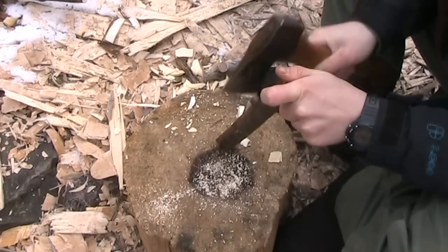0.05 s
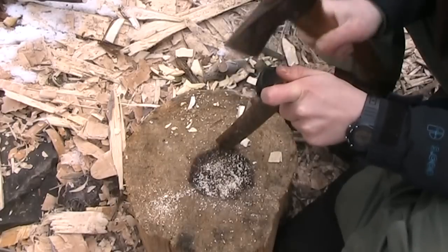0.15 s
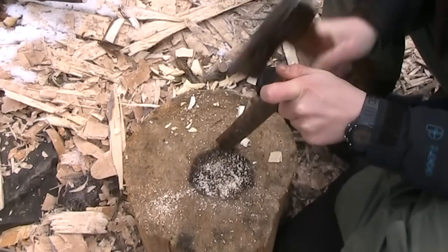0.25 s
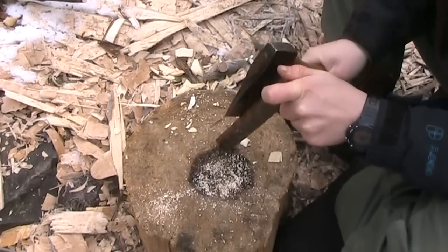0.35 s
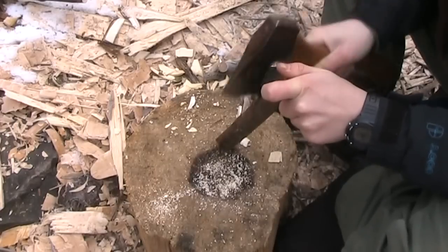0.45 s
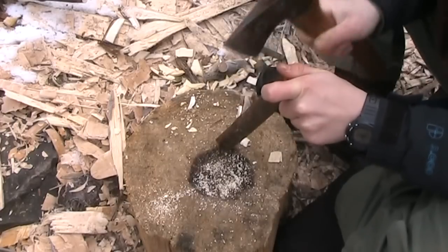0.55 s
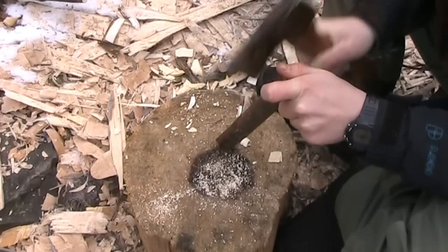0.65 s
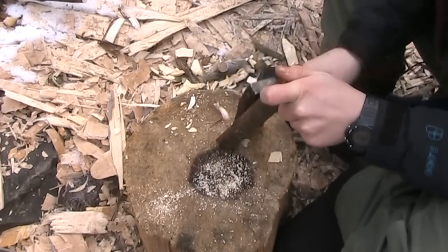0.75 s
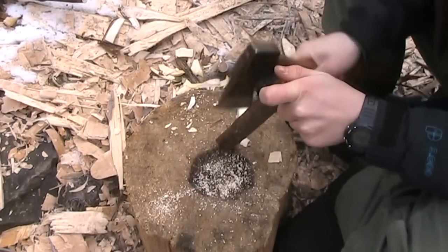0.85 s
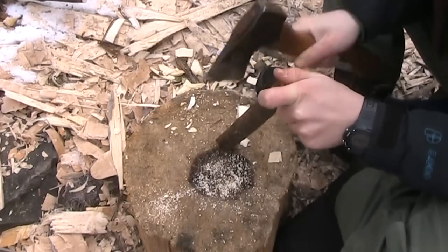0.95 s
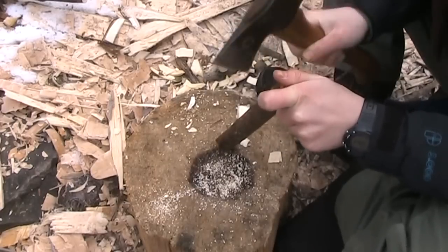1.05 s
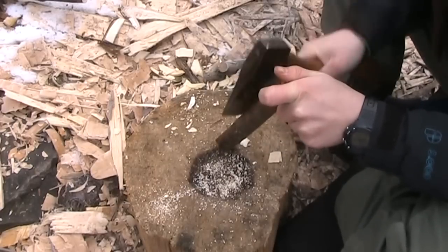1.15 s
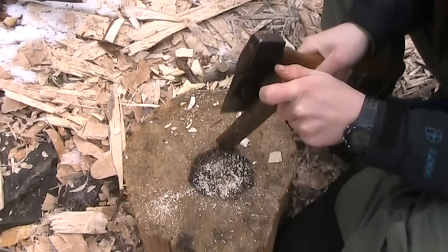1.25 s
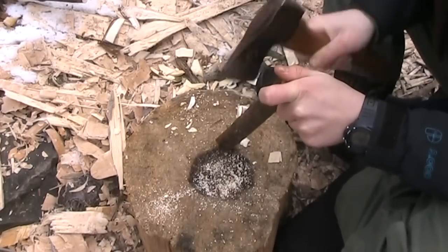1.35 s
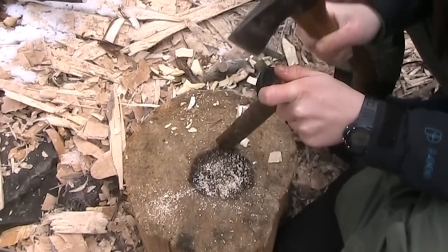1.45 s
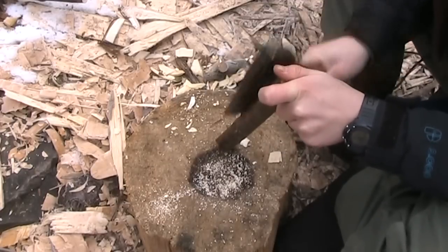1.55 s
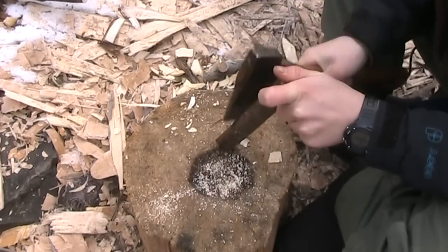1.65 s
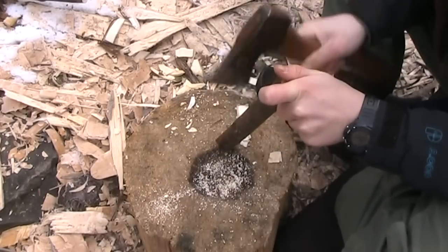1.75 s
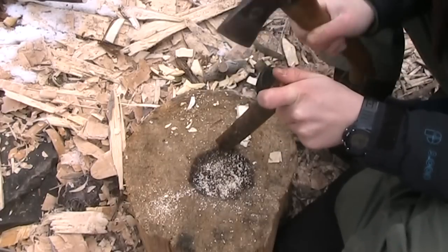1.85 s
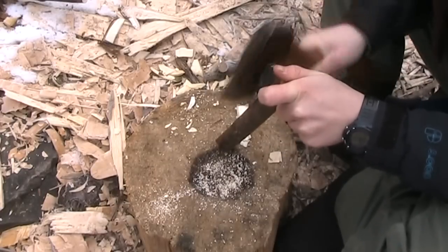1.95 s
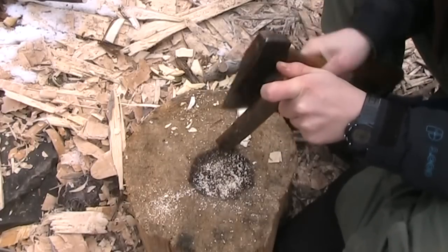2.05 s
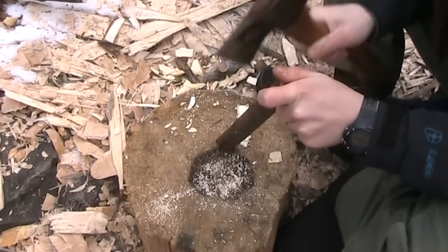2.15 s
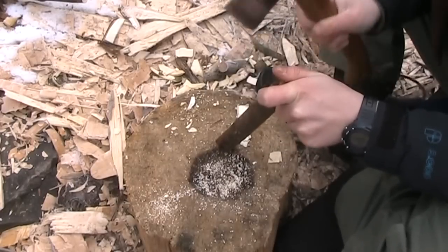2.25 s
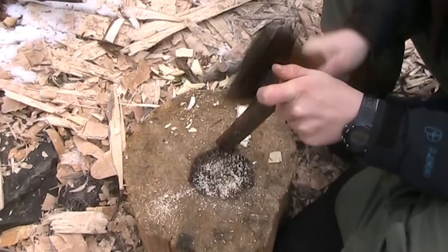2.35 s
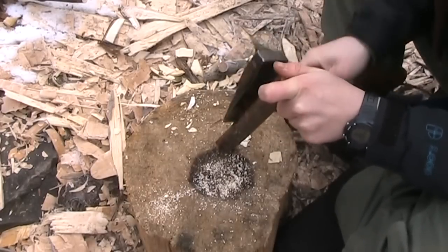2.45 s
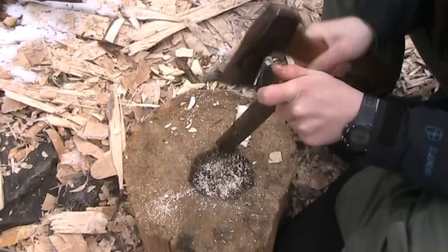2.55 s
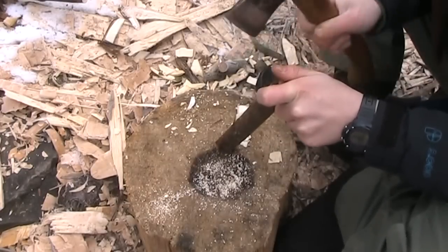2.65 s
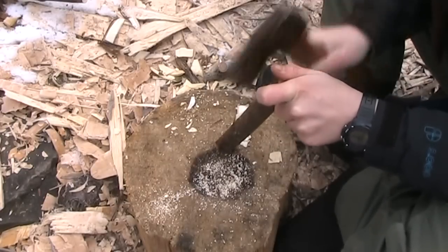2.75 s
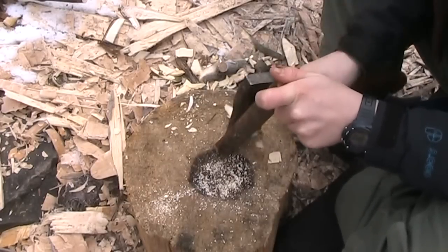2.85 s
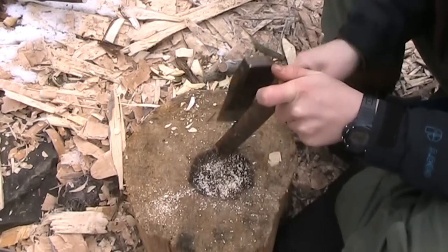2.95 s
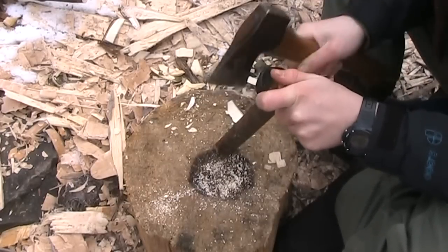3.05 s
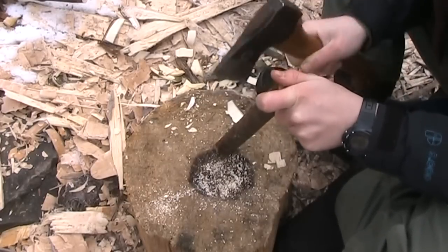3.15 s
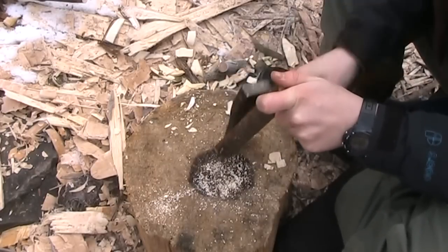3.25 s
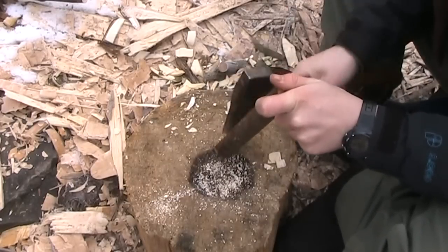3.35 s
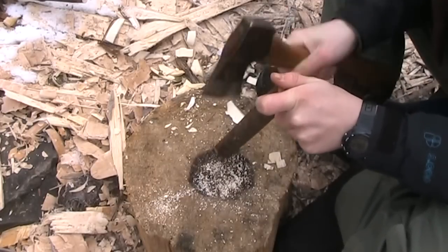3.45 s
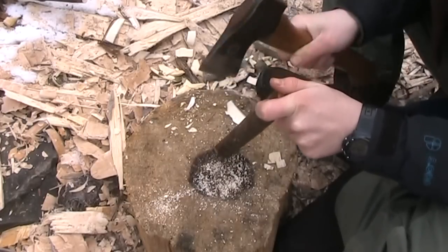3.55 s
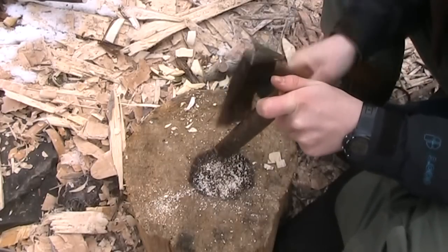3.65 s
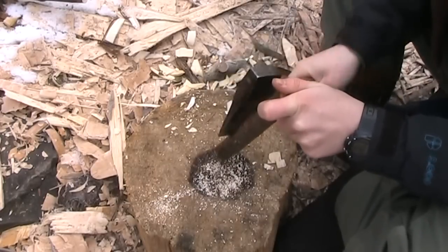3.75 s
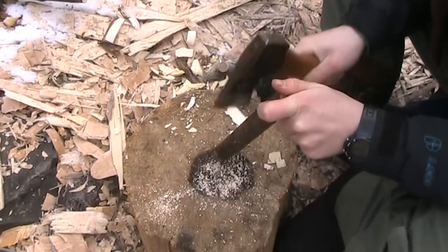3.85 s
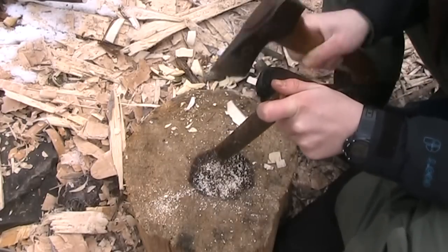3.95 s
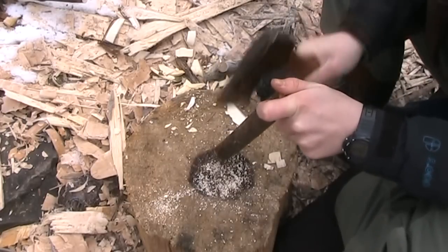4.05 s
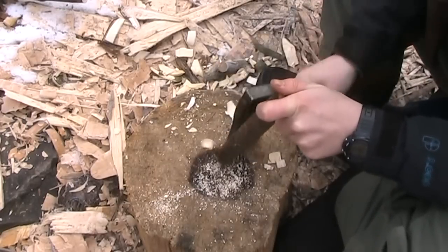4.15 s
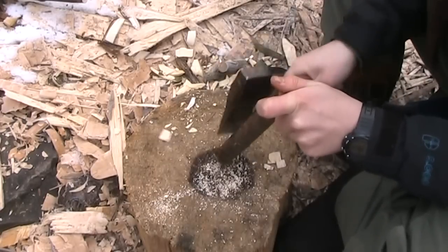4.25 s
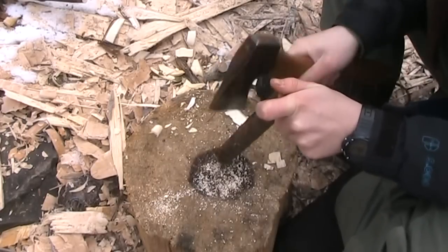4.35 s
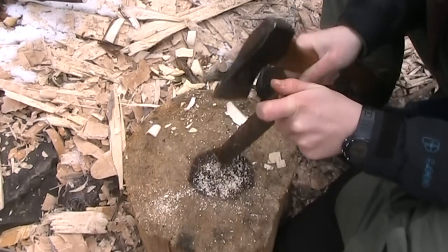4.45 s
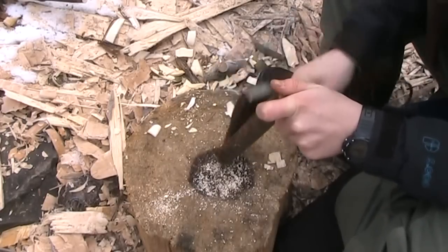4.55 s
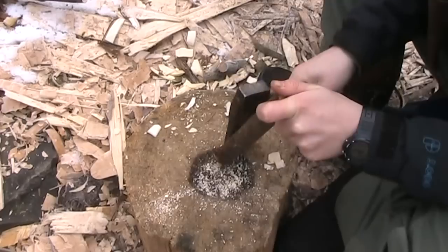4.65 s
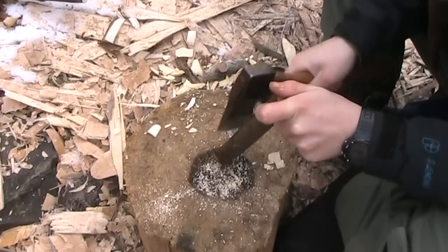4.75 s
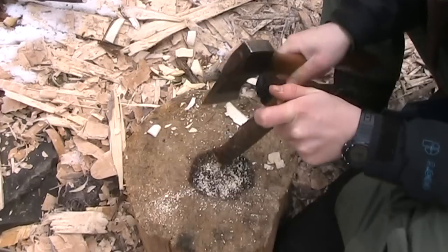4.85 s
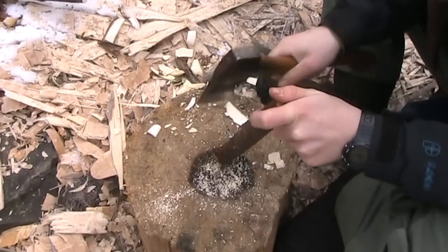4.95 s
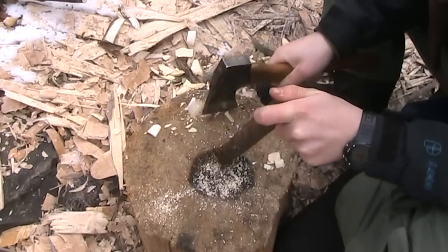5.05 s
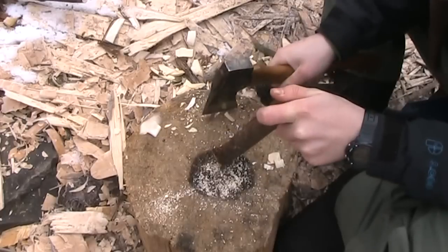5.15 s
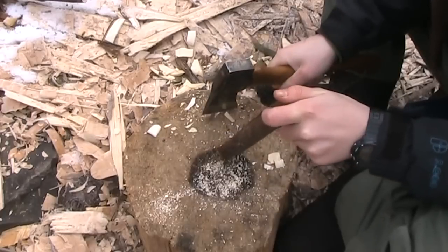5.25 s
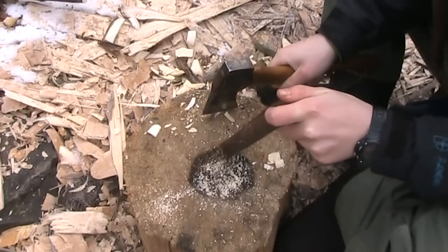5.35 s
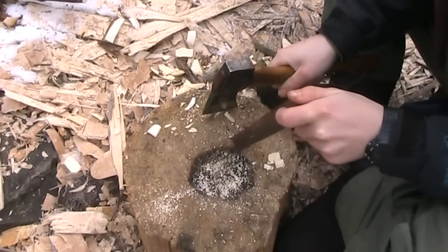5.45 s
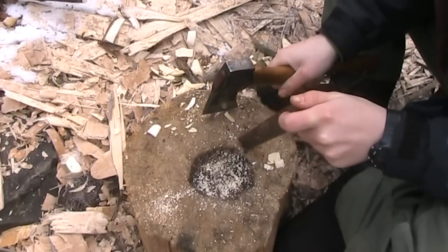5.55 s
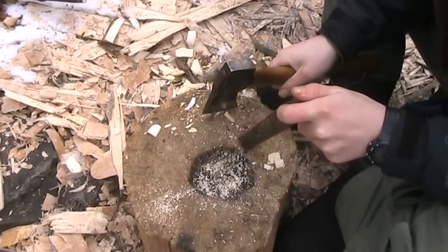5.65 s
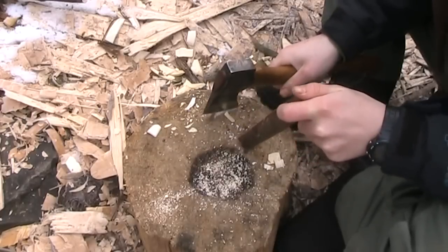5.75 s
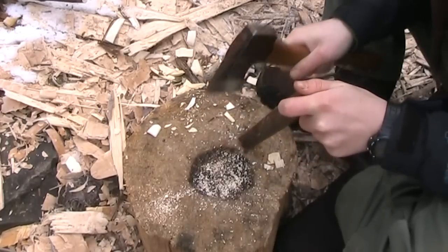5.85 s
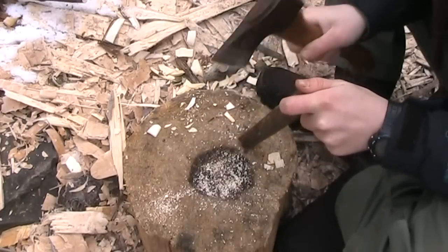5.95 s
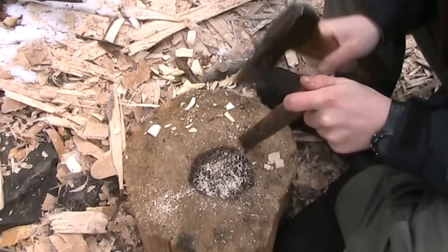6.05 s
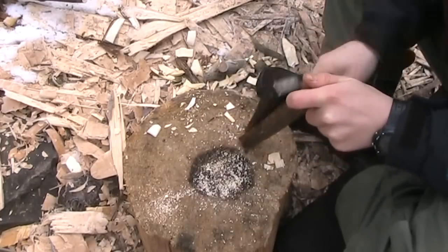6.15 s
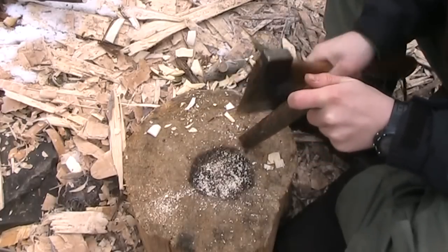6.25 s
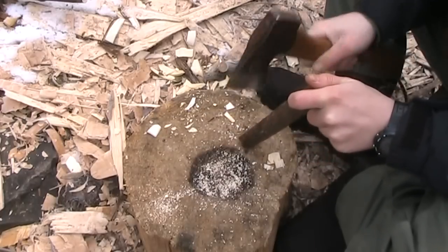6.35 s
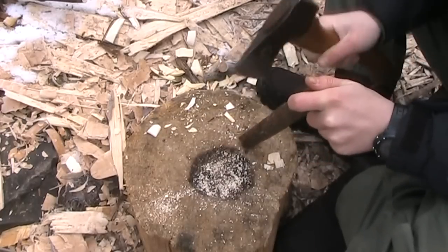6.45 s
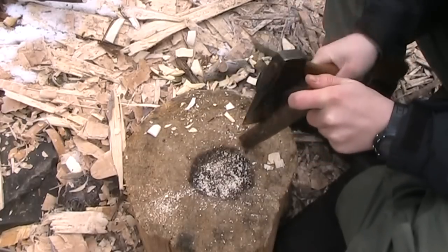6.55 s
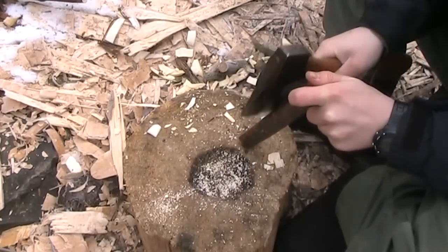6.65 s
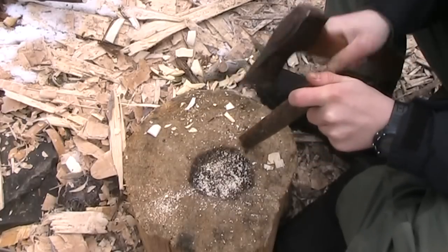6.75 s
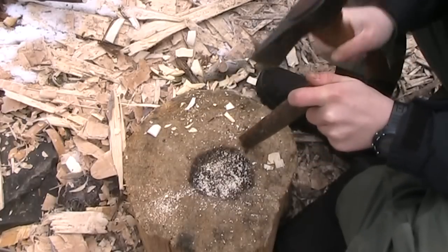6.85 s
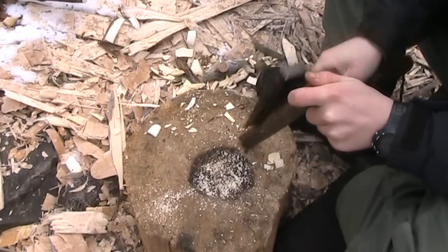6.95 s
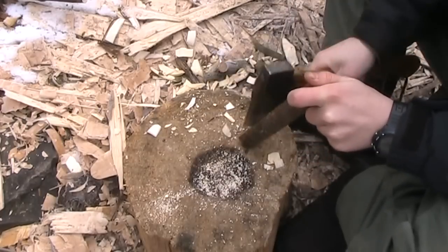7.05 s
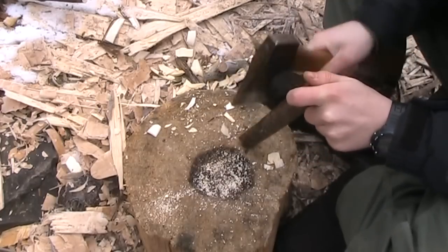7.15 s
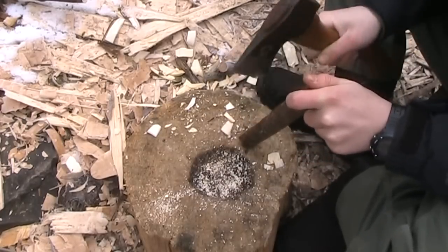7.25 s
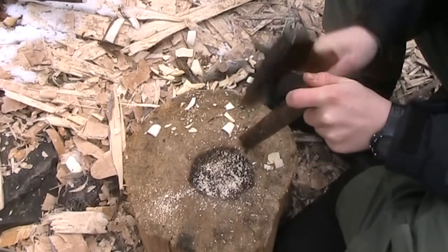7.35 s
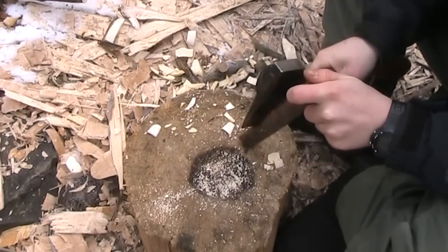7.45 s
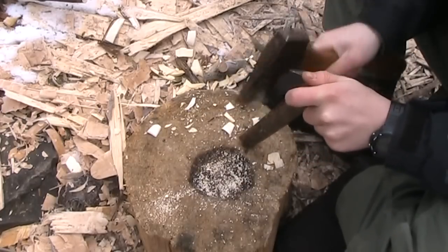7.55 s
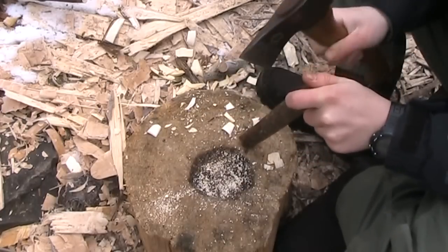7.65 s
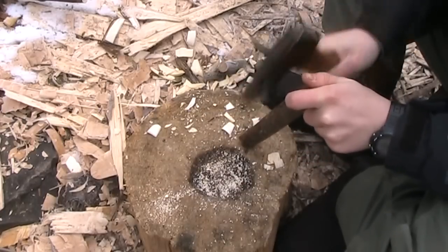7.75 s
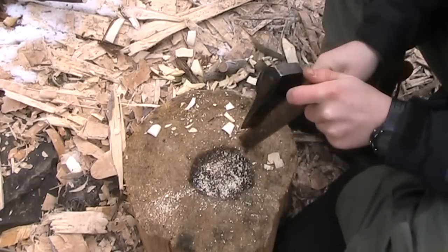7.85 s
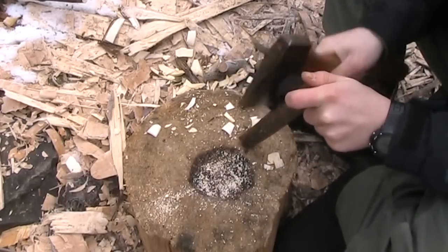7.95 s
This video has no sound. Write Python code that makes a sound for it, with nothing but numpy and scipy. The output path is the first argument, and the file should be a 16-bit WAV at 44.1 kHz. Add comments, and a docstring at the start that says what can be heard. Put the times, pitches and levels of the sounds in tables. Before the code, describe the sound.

Steady chopping of wood, close microphone, open air with little echo. Short knocking cracks, roughly two and a half per second, are followed within hundredths of a second by ripping grain and sometimes a low block thump. Small splinters tick down between blows. Just after five seconds the work stops briefly, cloth rustles, then chopping resumes to the end. A soft low rumble, gentle hiss and a barely audible far bird fill the background.

```python
"""Hatchet chopping on a block

A small hatchet chops shavings off a stick held on a wooden block, outdoors and close by.
Each bite rings damped modes of stick and steel; breaking fibres tear along the grain as shaped noise.
The block answers with a dull thud: a short low push, a knock, crushed grit and a hollow ring.
Chips tick as clusters of modes and cloth rubs as uneven noise, over faint echoes, still air and a far bird."""
import sys
import numpy as np
from scipy import signal
from scipy.fft import rfft, irfft, next_fast_len
from scipy.io import wavfile
from scipy.ndimage import map_coordinates

SR = 44100
rng = np.random.default_rng(int(sys.argv[2]) if len(sys.argv) > 2 else 0)


def generate_wav(signal):
    """Clip the signal to [-1, 1] and save it as 16-bit WAV at the path in sys.argv[1]."""
    frames = np.transpose(np.atleast_2d(signal))
    scaled = np.clip(frames, -1, 1) * 32767
    pcm = np.round(scaled).astype(np.int16)
    wavfile.write(sys.argv[1], SR, pcm)


N = 352359  # samples
TOP_HZ = 15850  # upper band limit

# The edge bites. Each row: time in seconds, strength in dB, extra depth of the low mode in dB,
# hardness in dB, main mode in Hz, clink in Hz.
BITES = [(0.2559, -9.5, 8, -6, 2010, 4200), (.2738, -4.5, 7.5, -25, 1300, 4400),
         (0.2758, -8, 14, -1, 1500, 4240), (0.6591, -1.5, 8.5, 0, 1620, 4050),
         (0.6724, -0.5, 5, 3, 1740, 4900), (1.1095, -5, 8.5, -8, 1660, 4320),
         (1.5082, 0.5, 0, 2.5, 1680, 4180), (1.9295, 1, 0.5, 3, 1760, 4290),
         (2.3254, -1, 1, 5.5, 1800, 4260), (2.3345, -8, 9.5, -10, 1540, 5200),
         (2.7377, 0.5, -5, 7.5, 1840, 4180), (3.1955, 1.5, -2, -4.5, 1790, 4220),
         (3.6435, 0, -2.5, -9, 1740, 4200), (4.0628, 1.5, -8, 0, 1780, 4270),
         (4.0722, -7, 0, -18, 1480, 4340), (4.4943, 0, 1.5, -12.5, 1850, 4420),
         (4.9654, -15.5, 13.5, 11, 1440, 4300), (6.0818, 0, 0.5, 1, 1850, 4260),
         (6.118, -10.5, -5, -17, 1380, 4040), (6.506, 1, -8.5, 3, 1775, 4440),
         (6.8962, 1, -3, -3.5, 1820, 4160), (7.3428, 1.5, -9, -26, 1493, 4450),
         (7.7429, 2, -18, -1, 1753, 4600)]
# The blade runs down the stick to the block. Each row: arrival in seconds,
# tearing level on arrival in dB, thud level in dB.
BLADE_RUNS = [(0.2826, -31.5, -13.5), (.719, -40.5, -1), (1.1248, -32, -15.5), (1.528, -34.5, -27),
              (1.941, -39, -21.5), (2.3425, -32.5, -21), (2.7787, -39, -3), (3.2457, -43, -1),
              (3.6536, -34, -22), (4.1033, -41.5, -3.5), (4.527, -37, 1), (4.967, -37.5, -6),
              (6.1417, -43.5, -2), (6.5136, -47, -23.5), (6.9583, -42, -1.5), (7.3584, -36, -21),
              (7.7528, -35.5, -24.5)]
# Colour of fracture noise. Each row: frequency in Hz, relative level in dB.
FRACTURE_COLOUR = [(1500, 12.5), (3000, 7), (5200, 3), (6700, 5.5), (8300, -10), (10500, -2.5),
                   (12300, -12.5), (16000, -26.5)]


def amp(db):
    """Decibels to gain."""
    return 10 ** (np.asarray(db) / 20)


def unit(x):
    """Scale to rms 1."""
    return x / np.sqrt(np.mean(x ** 2) + 1e-20)


def along(points, hz):
    """Read (Hz, value) points on a log frequency axis."""
    f, v = np.transpose(points)
    return np.interp(np.log(hz + 1), np.log(f + 1), v)


def curves(rows):
    """One value per sample for each column after the time."""
    s, *cols = np.transpose(rows)
    return [np.interp(np.arange(N) / SR, s, c) for c in cols]


def filtered(x, response):
    """Shape x by a response given as a function of frequency."""
    m = next_fast_len(N + SR // 2)
    spectrum = rfft(x, m) * response(np.fft.rfftfreq(m, 1 / SR))
    return irfft(spectrum, m)[..., :N]


def coloured(x, spectrum):
    """Give x a spectral colour, at rms 1."""
    return unit(filtered(x, lambda hz: amp(along(spectrum, hz))))


def without_bass(x, hz, order):
    """A small body radiates little below hz."""
    return signal.sosfilt(signal.butter(order, hz, "highpass", fs=SR, output="sos"), x)


def add(track, s, sound):
    """Mix a sound into the track at time s."""
    start = max(0, round(s * SR))
    part = track[start:start + len(sound)]
    part += sound[:len(part)]


def ring(t, hz, t60):
    """One mode: a sine that falls by 60 dB in t60 seconds."""
    return np.sin(2 * np.pi * hz * t) * amp(-60 * t / t60)


def struck(t, hz, t60, rise_cycles=2.5):
    """A mode pushed by a yielding contact builds up over its first cycles."""
    return ring(t, hz, t60) * (1 - np.exp(-t * hz / rise_cycles))


def chops(lowest_hz=400):
    """The firm bites of the edge and the lighter catches that follow them."""
    out = np.zeros(N)
    fracture = coloured(rng.standard_normal(N), FRACTURE_COLOUR)
    for s, *blow in BITES + catches():
        add(out, s, bite(fracture[round(s * SR):][:SR // 6], *blow))
    return without_bass(out, lowest_hz, order=4)


def bite(fracture, db, depth_db, hard_db, hz, steel_hz,
         main_db=7, main_t60=0.0085, ring_growth=0.12, high_growth=1.0,
         steel_db=-3.0, steel_t60=0.009, steel_growth=1.76, steel_hard_growth=.2,
         crack_db=-11, crack_t60=0.0092, edge_db=-7.5, edge_t60=0.0026, edge_top_hz=5000,
         dust_db=-38, dust_t60=.12):
    """One contact: a click, a crack, hand-damped modes of the stick, a clink of the head, a spray of dust."""
    # Low, middle and high modes of the stick. Each row: frequency in Hz, level in dB, t60 in seconds.
    stick_modes = [(715, 7.5, 0.006), (1222, 8, 0.0068), (2690, 6, 0.003)]
    t = np.arange(len(fracture)) / SR
    # a firm bite rings longer
    stick = amp(main_db) * struck(t, hz, main_t60 * amp(ring_growth * db))
    # the point of impact sets the low mode; hard wood brings out the high mode and the crack
    extras_db = (depth_db, 0, high_growth * hard_db)
    for (f, level, t60), extra in zip(stick_modes, extras_db):
        stick += amp(level + extra) * struck(t, f, t60)

    lowpass = signal.butter(4, min(edge_top_hz, TOP_HZ), fs=SR, output="sos")
    contact = signal.sosfilt(lowpass, rng.standard_normal(len(t)))
    click = amp(edge_db - 60 * t / edge_t60) * unit(contact)

    crack = amp(crack_db + hard_db - 60 * t / crack_t60) * fracture
    dust = amp(dust_db - 60 * t / dust_t60) * fracture

    # the clink grows faster than the blow, so light contacts hardly sound the steel
    clink_db = steel_db + steel_growth * db + steel_hard_growth * hard_db
    clink = amp(clink_db) * struck(t, steel_hz, steel_t60)
    return amp(db) * (stick + click + crack + dust) + clink


def catches(gap_s=.012, scatter_s=.002, over_tear_db=20, spread_db=5.5, fade_db=7, depth_db=-1, hard_db=-7,
            catch_hz=1550, clink_hz=4300, pitch_spread=0.22, count=4):
    """On a long run the blade catches repeatedly, on average ever more lightly: rows like those of BITES."""
    rows = []
    chance = rng.standard_normal((len(BLADE_RUNS), count, 3))
    for (start, length, tear_db), luck in zip(runs(), chance):
        for k, (late, size, shift) in enumerate(luck):
            run = gap_s * (k + .5)
            if run + gap_s < length:
                s = start + run + scatter_s * late
                db = tear_db + over_tear_db + spread_db * size - fade_db * run / length
                hz = catch_hz * np.exp(pitch_spread * shift)
                rows.append((s, db, depth_db, hard_db, hz, clink_hz))
    return rows


def runs(grip_s=0.0046, swing_s=.2, shortest_s=.002):
    """The blade runs from just after a swing's first bite to the block: (start s, length s, tearing dB)."""
    rows = []
    for arrival, tear_db, _ in BLADE_RUNS:
        # all contacts of one swing fall within swing_s
        first = min(s for s, *_ in BITES if s > arrival - swing_s)
        travel = max(arrival - first, shortest_s)
        length = max(travel - grip_s, travel / 2)
        rows.append((arrival - length, length, tear_db))
    return rows


def tears(snaps_per_s=7000, bundles_per_s=300, bundle_db=6, fade_db=12, release_s=.0031, cut_splinter_db=-6):
    """Fibres break in bundles ahead of the blade, exciting wood and bright splinters; freed shavings snap off."""
    # A shaving breaks away brightly. Each row: start in seconds, length in seconds, closing level in dB.
    shaving_snaps = [(.259, .008, -32.5), (0.675, 0.0038, -26.5), (1.525, 0.024, -45),
                     (2.7768, 0.0025, -36), (3.036, 0.0049, -37.5), (4.962, 0.0033, -34.5),
                     (4.9652, .001, -12), (5.365, 0.011, -38.5)]
    # Colours of the torn wood, its splinters and a breaking shaving.
    # Each row: frequency in Hz, relative level in dB.
    wood_colour = [(150, -5), (450, 0.5), (1100, 0.5), (1900, -3.5), (2400, -3), (4000, -82.5), (9000, -77)]
    splinter_colour = [(1500, -53), (3300, -10), (4300, 14.5), (5400, -7.5), (8000, -4.5), (12000, -1.5),
                       (16000, -18)]
    shaving_colour = [(1500, -27), (3000, 0.5), (5000, 8), (7000, 1.5), (9000, -8), (12000, -3),
                      (16000, -16.5)]

    knots = np.arange(N) * bundles_per_s / SR
    bundles = np.tanh(map_coordinates(rng.standard_normal(N), [knots], order=1))
    snaps = (rng.random(N) < snaps_per_s / SR) * np.sign(rng.standard_normal(N))
    fibres = snaps * amp(bundle_db * bundles)
    t = np.arange(SR // 8) / SR

    def stroke(length):
        """The blade slows down, so the tearing fades and then lets go."""
        return amp(fade_db * (1 - t / length)) * np.exp(-np.maximum(t - length, 0) / release_s)

    running, breaking = np.zeros(N), np.zeros(N)
    for start, length, db in runs():
        add(running, start, amp(db) * stroke(length))
    for start, length, db in shaving_snaps:
        add(breaking, start, amp(db) * stroke(length))
    torn = coloured(fibres, wood_colour) + amp(cut_splinter_db) * coloured(fibres, splinter_colour)
    return running * torn + breaking * coloured(fibres, shaving_colour)


def thuds(full_hz=340, hz_per_db=4.0, full_swell_s=0.0013, swell_growth=0.12,
          knock_db=-6, knock_hz=1060, knock_t60=0.0074, grit_db=-28, grit_t60=0.046, lowest_hz=125):
    """The heavy block takes the blow: a push of about two cycles, a knock, crushed grit, a faint hollow ring."""
    # Modes of the block, each varied a little per blow.
    # Each row: central frequency in Hz, central level in dB, t60 in seconds.
    block_modes = [(158.7, -32, 0.12), (257, -36, 0.23), (335, -21, 0.079), (388.6, -35.5, 0.14),
                   (583, -32, 0.089), (1050, -33.5, 0.064), (1233, -27.5, 0.087), (1864, -19.5, 0.017)]
    out, t = np.zeros(N), np.arange(SR // 4) / SR
    grit = coloured(rng.standard_normal(N), FRACTURE_COLOUR)
    chance = rng.standard_normal((len(BLADE_RUNS), 2, len(block_modes)))
    for (s, _, db), (sizes, shifts) in zip(BLADE_RUNS, chance):
        # a harder landing is a stiffer contact: higher and quicker
        hz = full_hz + hz_per_db * db
        swell = full_swell_s * amp(-swell_growth * db)
        push = -t / swell * np.exp(1 - t / swell) * np.sin(2 * np.pi * hz * t)
        hollow = np.zeros(len(t))
        for (f, level, t60), a, b in zip(block_modes, sizes, shifts):
            hollow += amp(level + 2 * a) * ring(t, f * (1 + 0.0284 * b), t60)
        knock = amp(knock_db) * struck(t, knock_hz, knock_t60, rise_cycles=0.39)
        crush = amp(grit_db - 60 * t / grit_t60) * np.roll(grit, -round(s * SR))[:len(t)]
        add(out, s, amp(db) * (push + hollow + knock + crush))
    return without_bass(out, lowest_hz, order=2)


def chips(cycles=10, spread=0.423, count=28, rise_cycles=0.62):
    """Each chip or crumb ticks as a cluster of modes that build up and die away quickly."""
    # Light wooden ticks as chips snap off and land or the stick shifts.
    # Each row: time in seconds, peak level in dB, central pitch in Hz.
    chip_ticks = [(.437, -36.5, 780), (0.809, -26.5, 950), (.9672, -33, 8100), (.978, -34, 8000),
                  (2.128, -36, 7200), (2.778, -4, 9900), (2.911, -27, 1040), (2.961, -30, 7460),
                  (3.04, -13, 7900), (3.0696, -30, 6000), (3.304, -34, 5900), (4.234, -40.5, 280),
                  (5.146, -35, 7170), (5.364, -19.5, 6500), (5.369, -21.5, 6400), (5.377, -25, 7400),
                  (7.294, -40, 747), (7.712, -36, 740)]
    out, t = np.zeros(N), np.arange(SR // 32) / SR
    ticks = chip_ticks + crumbs()
    for (s, db, hz), luck in zip(ticks, rng.standard_normal((len(ticks), 2, count))):
        tick = np.zeros(len(t))
        for a, b in luck.T:
            mode_hz = min(hz * np.exp(spread * b), TOP_HZ)
            tick += np.sign(a) * struck(t, mode_hz, 0.0057 + cycles / hz, rise_cycles)
        add(out, s, amp(db) * tick / np.abs(tick).max())
    return out


def crumbs(count=2, flight_s=0.081, flight_spread=0.66, crumb_db=-41, growth=0.29, spread_db=3, crumb_hz=6500):
    """Each cut throws crumbs that land soon after, louder after a heavy blow: (s, peak dB, pitch Hz)."""
    rows = []
    chance = rng.standard_normal((len(BLADE_RUNS), count, 2))
    for (s, _, thud_db), luck in zip(BLADE_RUNS, chance):
        for late, size in luck:
            landing = s + flight_s * np.exp(flight_spread * late)
            rows.append((landing, crumb_db + growth * thud_db + spread_db * size, crumb_hz))
    return rows


def sleeve(grain=0.56):
    """Jacket cloth rubs in tiny uneven slips, on both sides, as the arms move."""
    # How strongly the cloth rubs. Each row: time in seconds, level in dB.
    rubs = [(0, -58.5), (.95, -54), (1.2, -57), (2.7, -57.5), (3.25, -54), (3.9, -54), (4.6, -61),
            (5.28, -54.5), (5.39, -41.5), (5.48, -45.5), (5.51, -56), (5.88, -53), (6.04, -48), (6.3, -58),
            (6.7, -58.5), (7.0, -54.5), (7.45, -58.5), (7.99, -57.5)]
    # Colour of the cloth. Each row: frequency in Hz, relative level in dB.
    cloth_colour = [(150, -12), (600, 5.5), (2000, 3.5), (5000, 1), (9000, -3), (13000, -9), (16000, -15)]
    slips = rng.standard_normal((2, N)) * np.exp(grain * rng.standard_normal(N))
    return amp(curves(rubs)[0]) * coloured(slips, cloth_colour)


def echoes(x, decay, delay):
    """Diffuse reflections as decaying noise, redrawn three times a second as the body moves."""
    out, t = np.zeros(N), np.arange(SR // 2) / SR
    for start in range(0, N, SR // 3):
        hz, frames, z = signal.stft(rng.standard_normal(len(t)), SR, nperseg=128)
        fade = amp(-60 * frames / along(decay, hz)[:, None])
        tail = signal.istft(z * fade, SR, nperseg=128)[1]
        reflected = signal.fftconvolve(x[start:start + SR // 3], tail / np.linalg.norm(tail))
        add(out, start / SR + delay, reflected)
    return out


def placed(x):
    """Mostly left of centre by level, widened by a phase-turned copy of opposite sign in each ear."""
    # Stereo balance. Each row: frequency in Hz, left minus right in dB.
    balance = [(300, -0.4), (700, .6), (1400, 2), (2500, 3), (4500, 0.4), (9000, 2), (14000, 4)]
    # Stereo width. Each row: frequency in Hz, side minus mid in dB.
    side_level = [(300, -26), (1500, -18.5), (4500, -20.5), (9000, -12), (14000, -6)]
    side = filtered(x, lambda hz: 1j * amp(along(side_level, hz)))  # a quarter-cycle turn
    halves = np.array([[.5], [-.5]])
    return filtered(np.array([x + side, x - side]), lambda hz: amp(along(balance, hz) * halves))


def bird(blur_hz=130):
    """Distance smears each thin whistle into a narrow band of noise."""
    # Each row: start in seconds, length in seconds, pitch in Hz, level before the swell in dB.
    far_whistles = [(0.841, 0.26, 3420, -64), (3.356, .1, 4370, -57.5), (3.492, .08, 4400, -61),
                    (3.972, 0.076, 3350, -63), (4.249, .08, 4180, -65), (4.382, 0.065, 4200, -65),
                    (5.168, .08, 4200, -63)]
    out = np.zeros(N)
    lowpass = signal.butter(2, blur_hz, fs=SR, output="sos")
    for s, length, hz, db in far_whistles:
        t = np.arange(round(length * SR)) / SR
        smear = signal.sosfilt(lowpass, rng.standard_normal(SR // 2))[:len(t)]
        whistle = unit(smear * np.sin(2 * np.pi * hz * t))
        add(out, s, amp(db) * whistle * np.sin(np.pi * t / length))
    return out


def air(rumble_db=2, hiss_db=3.5, rumble_side_db=-19):
    """A distant rumble nearly alike in both ears, and a soft hiss that differs between them."""
    # The air's level before the trims above. Each row: time in seconds, rumble in dB, hiss in dB.
    air_level = [(0.0, -58.5, -58.5), (0.62, -55, -57), (5.34, -55.5, -57), (5.9, -53, -55),
                 (7.37, -52.5, -55.5), (7.99, -55, -58.5)]
    # Colours of rumble and hiss. Each row: frequency in Hz, relative level in dB.
    rumble_colour = [(15, -20), (30, -19), (44, -19), (54, 0.5), (66, -3), (80, -8.5), (115, -6),
                     (170, -14.5), (300, -28.5), (800, -69)]
    hiss_colour = [(60, -29), (150, 0.5), (300, 2), (1000, -3.5), (2000, -11.5), (4500, -20),
                   (10000, -31.5), (16000, -30.5)]
    rumble_level, hiss_level = curves(air_level)
    mid, side = coloured(rng.standard_normal((2, N)), rumble_colour)
    rumble = mid + amp(rumble_side_db) * np.array([side, -side])
    hiss = coloured(rng.standard_normal((2, N)), hiss_colour)
    return amp(rumble_level + rumble_db) * rumble + amp(hiss_level + hiss_db) * hiss


def scene(near_db=-20, near_wide_db=-26, far_db=-33, block_echo_db=-7):
    """The work on the block, its echoes, the sleeve, the far bird and the still air."""
    # Decay of the echoes off the ground and the far surroundings.
    # Each row: frequency in Hz, t60 in seconds.
    near_decay = [(200, 0.16), (1500, 0.083), (5000, 0.075), (14000, 0.1)]
    far_decay = [(200, 0.47), (1500, 0.6), (4500, 0.41), (12000, 0.62)]
    cutting, block = chops() + tears() + chips(), thuds()
    sent = cutting + amp(block_echo_db) * block
    ground = amp(near_db) * echoes(sent, near_decay, delay=0.0041)
    around = []
    for ear in range(2):
        near = amp(near_wide_db) * echoes(sent, near_decay, delay=.012)
        far = amp(far_db) * echoes(sent, far_decay, delay=0.015)
        around.append(near + far)
    return placed(cutting + block + ground + bird()) + np.array(around) + sleeve() + air()


def record(dry, ceiling=1.2):
    """The loudest peaks are rounded off, and the treble falls away steeply at the band limit."""
    rounded = dry / (1 + np.abs(dry / ceiling) ** 12) ** (1 / 12)
    return filtered(rounded, lambda hz: 1 / (1 + (hz / TOP_HZ) ** 160))


dry = scene()
out = record(dry)
generate_wav(out)
```